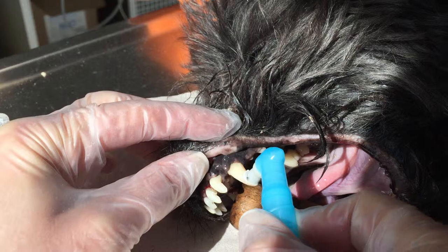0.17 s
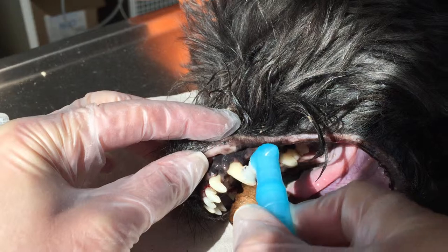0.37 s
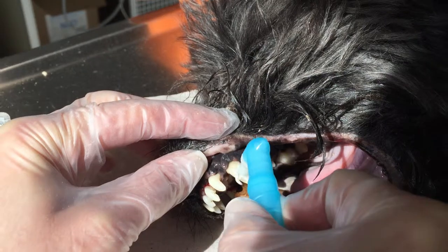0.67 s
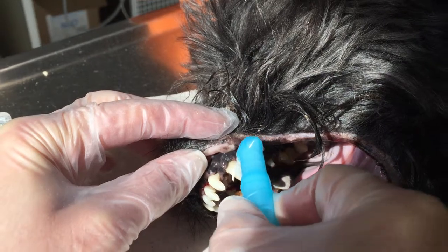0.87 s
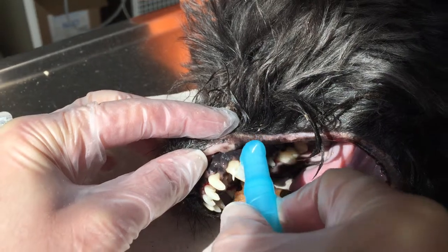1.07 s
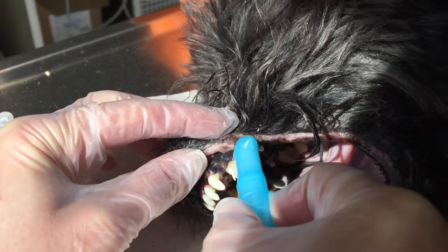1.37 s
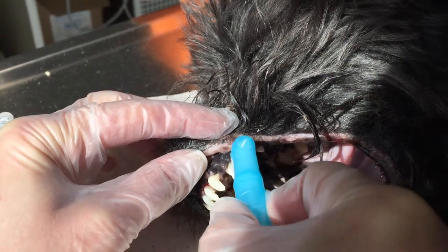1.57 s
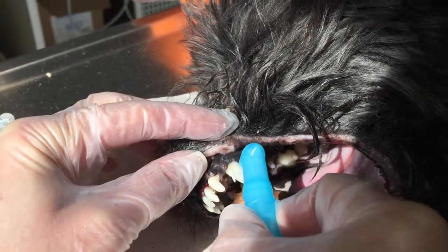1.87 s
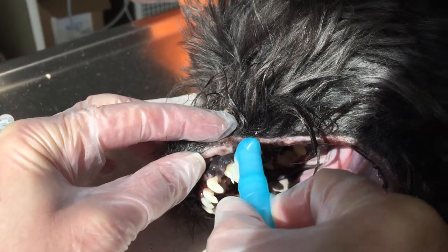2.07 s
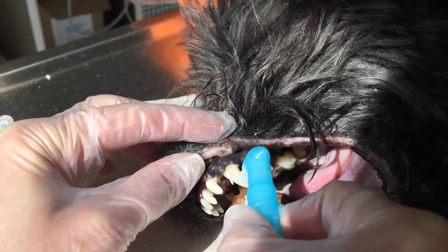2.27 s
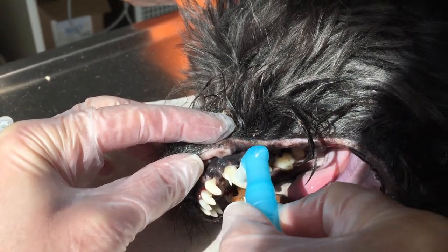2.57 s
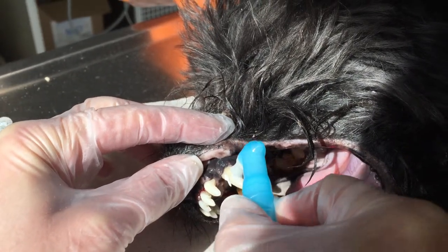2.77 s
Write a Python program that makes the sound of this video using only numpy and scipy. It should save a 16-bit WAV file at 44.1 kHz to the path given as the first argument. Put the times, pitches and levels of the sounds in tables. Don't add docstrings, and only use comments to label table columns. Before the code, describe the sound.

After a tiny silence, a dental polisher is already running close to the microphone: a steady raspy buzz of fast clicks and wet paste scrubbing, shifting with the mouth, with high rubbery squeal coming and going in a quiet clinic room.

```python
import sys
import numpy as np
from scipy import signal
from scipy.fft import rfft, irfft, next_fast_len
from scipy.io import wavfile
from scipy.ndimage import uniform_filter1d, map_coordinates

SR = 44100
rng = np.random.default_rng(int(sys.argv[2]) if len(sys.argv) > 2 else 0)


def voltage_ratio(level):
    return 10 ** (np.asarray(level, float) / 20)


def inscribe(sig):
    pcm = np.round(np.clip(np.atleast_2d(sig).T, -1, 1) * 32767)
    wavfile.write(sys.argv[1], SR, pcm.astype(np.int16))


N = 128772

# (time [s], reversals so far [count])
REVERSAL_COUNT = [(0.1214, 0), (0.1608, 4), (0.2012, 8), (0.3026, 18), (0.3841, 26), (0.4874, 36),
                  (0.6715, 54), (0.7335, 60), (0.9218, 78), (1.0496, 90), (1.2445, 108), (1.3105, 114),
                  (1.4404, 126), (1.8282, 162), (2.0193, 180), (2.1476, 192), (2.3997, 216), (2.4652, 222),
                  (2.5295, 228), (2.725, 246), (2.9224, 264)]
# (time [s], peak level [dB])
FORWARD_KNOCK = [(0.121, -30.5), (0.262, -34), (0.467, -28), (0.487, -24), (0.59, -31.5), (0.651, -24.5),
                 (0.901, -25), (1.093, -24.5), (1.136, -31), (1.18, -26), (1.223, -32), (1.266, -28),
                 (1.31, -31.7), (1.375, -25.5), (1.419, -23.5), (1.462, -29), (1.483, -26), (1.527, -24),
                 (1.548, -24.5), (1.656, -31.5), (1.677, -29), (1.699, -40), (1.72, -26.1), (1.807, -26),
                 (1.956, -23.5), (1.998, -27), (2.105, -22), (2.253, -23.5), (2.274, -24), (2.337, -22.4),
                 (2.422, -27), (2.465, -21.5), (2.573, -17), (2.813, -19.5), (2.879, -20.5), (2.9, -23)]
# (time [s], peak level [dB])
BACK_KNOCK = [(0.131, -30.5), (0.313, -24), (0.415, -31), (0.436, -30.5), (0.559, -31.5), (0.682, -24),
              (0.723, -24), (0.765, -20), (0.869, -28), (0.911, -20), (0.954, -31), (1.06, -19.5),
              (1.277, -19), (1.343, -13.5), (1.365, -20), (1.451, -14), (1.473, -23), (1.537, -16),
              (1.602, -20), (1.645, -13), (1.667, -15), (1.731, -15.5), (1.753, -21), (1.817, -18),
              (1.839, -20), (1.86, -14.5), (1.881, -21.7), (1.945, -24), (2.116, -10.5), (2.2, -16.5),
              (2.242, -14.5), (2.284, -20.5), (2.305, -17.6), (2.326, -20.5), (2.411, -11.5),
              (2.562, -21.5), (2.606, -15), (2.649, -17.5), (2.692, -12.5), (2.736, -12.5), (2.802, -27),
              (2.824, -15), (2.846, -24), (2.911, -23)]
# (time [s], peak level [dB])
FORWARD_SQUEAK = [(0.12, -53), (1.093, -33.5), (1.115, -34), (1.136, -19), (1.158, -23), (1.223, -15.5),
                  (1.266, -18), (1.31, -32), (1.332, -22.5), (1.375, -21.5), (1.44, -29), (1.462, -31),
                  (1.483, -22), (1.505, -34), (1.548, -18), (1.613, -19.5), (1.656, -12.5), (1.699, -26.5),
                  (1.807, -18), (1.828, -20), (1.849, -19.5), (1.871, -32.7), (1.892, -31), (1.977, -27.5),
                  (1.998, -36), (2.019, -36), (2.126, -31), (2.169, -37), (2.295, -39), (2.337, -38),
                  (2.4, -43), (2.443, -32), (2.53, -37), (2.551, -28), (2.66, -33), (2.747, -18.5),
                  (2.835, -15), (2.857, -22.5), (2.9, -14.5)]
# (time [s], peak level [dB])
BACK_SQUEAK = [(.12, -43), (.6, -45), (.78, -32.5), (1, -39.5), (2.45, -40), (2.54, -33), (2.585, -20),
               (2.62, -27), (2.67, -37), (2.72, -29), (2.8, -29.5), (2.845, -21), (2.865, -19), (2.89, -27),
               (2.92, -22)]
# (time [s], level [dB])
SCRUB_LEVEL = [(.12, -36), (.3, -35.5), (.4, -36), (.5, -37), (.65, -36), (.85, -38), (.97, -36),
               (1.1, -38), (1.5, -40), (1.95, -37.5), (2.1, -38), (2.3, -39), (2.42, -38), (2.5, -34),
               (2.65, -38), (2.92, -37.5)]
# (time [s], opening [0 shut, 1 half, 2 open])
MOUTH_OPENING = [(.12, 0), (.3, .15), (.4, 1), (.5, 1.6), (.6, 1.3), (.7, 2), (.9, 1.8), (.97, 1),
                 (1.2, 1.3), (1.45, 1.6), (1.95, 1.2), (2.2, 1.4), (2.42, 1.9), (2.48, .9), (2.6, 1.4),
                 (2.7, 1), (2.92, 1.2)]
# (time [s], peak level [dB])
SHAFT_LOAD = [(.13, -39), (.42, -32), (.6, -39), (.66, -31), (.8, -36), (.9, -39.5), (1.1, -33),
              (1.25, -38), (1.33, -29), (1.5, -35.5), (1.7, -33.5), (1.87, -34), (2.03, -38), (2.07, -26.5),
              (2.2, -29.5), (2.3, -36), (2.42, -27.5), (2.92, -31.5)]
# (time [s], frequency [Hz], level over back knock [dB])
CHEEK_GAP = [(.12, 2530, -8), (.3, 2570, -9), (.42, 3100, 7.5), (.6, 2930, 2.5), (.8, 3300, -1.5),
             (1.15, 3530, -12), (1.3, 3060, -13), (1.8, 2820, -12), (2, 3060, -11), (2.08, 2860, -14),
             (2.2, 3000, -13), (2.35, 3100, -3), (2.43, 3430, -7), (2.46, 2350, -8.5), (2.52, 2680, -3.5),
             (2.62, 2860, -18), (2.7, 2570, -13.5), (2.92, 2600, -24)]
# (time [s], frequency [Hz], level over back knock [dB])
TOOTH_RING = [(.12, 4100, -4), (1.2, 4150, -27), (1.3, 4300, -12.5), (1.45, 4300, -8), (1.6, 4160, -12),
              (1.9, 4480, -10), (2.02, 4380, -14), (2.06, 5200, -11.5), (2.18, 5300, -7), (2.26, 5230, -24),
              (2.35, 4060, -25), (2.42, 3950, -17), (2.55, 4230, -13), (2.7, 4600, -25), (2.92, 4100, -15)]
# (frequency [Hz], level over forward knock [dB], decay [dB/ms])
NECK_RING = [(2350, -10.5, 6.5), (6850, -2, 20)]
# (frequency [Hz], width [Hz], level [dB])
HEAD_MODES = [(1137, 303, -8.5), (4430, 1030, -3.5), (5480, 380, -1), (6603, 607, 4), (7815, 1140, 2),
              (9660, 760, 1.5), (12260, 2200, -5), (14780, 1170, -8.5)]
# (frequency [Hz], width [Hz], level [dB])
SHUT_MODES = [(1720, 620, 3.5), (2540, 640, 7), (3160, 760, 4.5)]
# (frequency [Hz], width [Hz], level [dB])
HALF_MODES = [(1940, 1300, -9.5), (2710, 274, 2.5), (3080, 530, 0.5)]
# (frequency [Hz], width [Hz], level [dB])
OPEN_MODES = [(1840, 590, -9), (2700, 510, 0.5), (3310, 310, 5)]
# (frequency [Hz], width [Hz], level [dB])
GEARBOX_MODES = [(848, 176, -2), (1065, 305, 2.5), (1880, 840, 3.5)]
# (multiple of reversal rate [-], rms level [dB])
MOTOR_ORDERS = [(3, -82), (4, -77), (5, -78.5), (6, -76.5), (7, -81)]
# (frequency [Hz], density [dB per Hz])
AIR_SPECTRUM = [(15, -38), (33, -5), (70, 1), (102, -11.5), (129, -6), (253, -6), (303, -5), (515, -9),
                (850, -6), (1100, -1), (1870, -120)]
# (frequency [Hz], rms level [dB])
FAN_LINES = [(48.4, -104), (68.7, -80), (305.4, -77.5)]
# (delay [s], level [dB])
ECHOES = [(.0031, -34), (.0064, -34.5), (.0093, -47)]

START_S, FADE_S = 0.1205, 0.00062
AROUND = np.arange(-400, 400)
AROUND_S = AROUND / SR
EARLY_S = 0.0003
TICK_BACK_S = 0.0042
SLIP_S = 2.5


def unit(x):
    return x / np.sqrt(np.mean(x ** 2) + 1e-20)


def at(rows, s, column=1):
    table = np.array(rows)
    return np.interp(s, table[:, 0], table[:, column])


def wobble(rate_hz):
    knots = rng.standard_normal(int(N * rate_hz / SR) + 4)
    return map_coordinates(knots, [np.arange(N) * rate_hz / SR])


def filtered(x, response):
    m = next_fast_len(N + 8192)
    return irfft(rfft(x, m) * response(np.fft.rfftfreq(m, 1 / SR)), m)[:N]


def ringing(peaks):
    def response(f):
        total = 0
        for k, (hz, width_hz, db) in enumerate(peaks):
            damping = 1j * f * width_hz
            total = total + (-1) ** k * voltage_ratio(db) * damping / (hz * hz - f * f + damping)
        return total
    return response


def placed(times_s, shapes):
    index = np.round(times_s * SR).astype(int)[:, None] + AROUND
    return np.bincount(index.ravel(), shapes.ravel(), N + SR)[:N]


def tent(rise_db_ms, fall_db_ms, hold_s=0):
    ms = AROUND_S * 1000
    return voltage_ratio(rise_db_ms * np.minimum(ms, 0) - fall_db_ms * np.maximum(ms - 1000 * hold_s, 0))


def reversals():
    s, count = np.transpose(REVERSAL_COUNT)
    times_s = np.interp(np.arange(count[-1] + 1), count, s)
    return times_s[::2], times_s[1::2]


def turning():
    s, count = np.transpose(REVERSAL_COUNT)
    t = np.arange(-SR, N) / SR
    speed = np.gradient(np.interp(t, np.r_[s[0] - 2, s], np.r_[-204, count]))
    lag = np.cumsum(uniform_filter1d(speed, size=2000) - speed)[SR:]
    total = np.cumsum(speed)
    return total[SR:] + lag - total[SR + round(s[0] * SR)]


def clinic():
    hz, density_db = np.transpose(AIR_SPECTRUM)
    air = filtered(rng.standard_normal(N), lambda f: voltage_ratio(np.interp(np.log(f + 1), np.log(hz), density_db)))
    t = np.arange(N) / SR
    fans = 0
    for fan_hz, db in FAN_LINES:
        level = np.sqrt(2) * voltage_ratio(db + 2.5 * wobble(9 + fan_hz / 15))
        fans = fans + level * np.sin(2 * np.pi * fan_hz * t)
    return voltage_ratio(-67.5 + 0.46 * wobble(7.4)) * unit(air) + fans


def motor():
    settles_s = 1
    t, count = np.arange(N) / SR, turning()
    lines = sum(voltage_ratio(db + 5 * wobble(7)) * np.sin(2 * np.pi * k * count) for k, db in MOTOR_ORDERS)
    return np.sqrt(2) * lines / (1 + (t / settles_s) ** 4) ** 0.5


def gears():
    level_db, start_db, settles_s = -53, 21.5, 0.35
    leak, cut_hz, mesh_db = 0.23, 870, 4
    t, turn = np.arange(N) / SR, turning() / 2
    flaws = rng.standard_normal((40, 256))
    place = [t * 5.52, turn % 1 * flaws.shape[1]]
    grind = map_coordinates(flaws, place, order=1, mode="grid-wrap")
    grind = grind * voltage_ratio(mesh_db * np.cos(8 * np.pi * turn))
    casing = ringing(GEARBOX_MODES)
    grind = filtered(grind, lambda f: casing(f) * (leak + f ** 6 / (f ** 6 + cut_hz ** 6)))
    return unit(grind) * voltage_ratio(level_db + start_db * np.exp(-t / settles_s))


def rattle(times_s, db, slopes_db_ms, scatter_db, crack):
    jitter_s = 0.0001
    shape = (len(times_s), len(AROUND))
    grit = rng.standard_normal(shape) * voltage_ratio(2.3 * rng.standard_normal(shape))
    grit = 1.8 * uniform_filter1d(grit, size=3, axis=0)
    draw = rng.standard_normal((len(times_s), 3))
    blow = grit * tent(*slopes_db_ms) + crack * voltage_ratio(draw[:, :1]) * (AROUND == 0)
    blow = 6.5 * blow / np.linalg.norm(blow, axis=1, keepdims=True)
    level = voltage_ratio(db + scatter_db * draw[:, 2])[:, None]
    return placed(times_s - EARLY_S + jitter_s * draw[:, 1], level * blow)


TICK_DB = -36.5


def early_tick_db(back):
    start_db, fade_s = -21, 0.3
    return TICK_DB + (start_db - TICK_DB) * np.exp(-((back - START_S) / fade_s) ** 2)


def knocks(forward, back):
    tick_s, tick_slopes_db_ms = 0.0049, (25, 10)
    x = rattle(forward, at(FORWARD_KNOCK, forward) + 2.9, (16, 9), 0.6, crack=3.9)
    x += rattle(back, at(BACK_KNOCK, back) + 0.74, (13, 7), 0.7, crack=7.9)
    x += rattle(forward + tick_s, TICK_DB, tick_slopes_db_ms, 2, crack=3.8)
    return x + rattle(back + TICK_BACK_S, early_tick_db(back), tick_slopes_db_ms, 0.6, crack=6.4)


def ring(times_s, hz, db, fall_db_ms):
    draw = rng.standard_normal((len(times_s), 3))
    struck_hz = (hz * (1 + 0.018 * draw[:, 0]))[:, None]
    tone = np.sin(2 * np.pi * struck_hz * AROUND_S + draw[:, 1:2])
    level = voltage_ratio(db + 0.41 * draw[:, 2])[:, None]
    return placed(times_s - EARLY_S, level * tent(23.5, fall_db_ms) * tone)


def rings(forward, back):
    x = np.zeros(N)
    for part in (CHEEK_GAP, TOOTH_RING):
        db = at(BACK_KNOCK, back) + at(part, back, column=2)
        x += ring(back, at(part, back), db, fall_db_ms=13.5)
    x += ring(back + TICK_BACK_S, 2200, early_tick_db(back) - 5.5, fall_db_ms=7.1)
    for hz, db, fall_db_ms in NECK_RING:
        x += ring(forward, hz, at(FORWARD_KNOCK, forward) + db, fall_db_ms)
    return x


def scrub():
    dull_hz = 6000
    grain = rng.standard_normal(N) * voltage_ratio(3 * wobble(1500) + 0.5 * wobble(120) + 0.55 * wobble(12))
    grain = filtered(grain, lambda f: 1 / (1 + 1j * f / dull_hz))
    return unit(grain) * voltage_ratio(at(SCRUB_LEVEL, np.arange(N) / SR))


def shaft(forward, back):
    sing_hz, rise_hz_ms = 1099, 40
    lead_s, forward_lead_s, forward_db = 0.0012, 0.00368, -9
    times_s = np.concatenate([back, forward - forward_lead_s]) - lead_s
    load_db = at(SHAFT_LOAD, times_s) + forward_db * (np.arange(len(times_s)) >= len(back))
    draw = rng.standard_normal((len(times_s), 2))
    hz = sing_hz + rise_hz_ms * 500 * AROUND_S
    tone = np.sin(2 * np.pi * hz * AROUND_S + 0.076 * draw[:, :1])
    level = voltage_ratio(load_db[:, None] + 1.2 * draw[:, 1:])
    return placed(times_s, level * tent(4.5, 8, hold_s=0.00048) * tone)


def squeak(times_s, rows, scatter_db):
    squeak_hz, chatter_lag = 5988, 50
    late, slipping = times_s > SLIP_S, np.arange(N) / SR > SLIP_S
    shape = tent(5.5, 16, np.where(late, 0.0018, 0.0014)[:, None])
    db = at(rows, times_s) + scatter_db * rng.standard_normal(len(times_s))
    lead_s = np.where(late, 0.0028, 0.0016)
    swell = placed(times_s - lead_s, voltage_ratio(db)[:, None] * shape)
    swell = uniform_filter1d(swell, size=15) * voltage_ratio(1.47 * wobble(800))
    rough = 0.0125 * np.where(slipping, 1.8, 1) * wobble(900)
    hz = squeak_hz * (1 + rough + 0.002 * wobble(30) - 0.012 * slipping)
    phase = 2 * np.pi * np.cumsum(hz) / SR
    overtone = voltage_ratio(-14.5 - 5 * slipping + 3 * wobble(900)) * np.sin(2 * phase + 0.5 * wobble(1500))
    tone = np.sin(phase) + overtone
    chatter_db = np.where(slipping, -6, -12) + 4 * wobble(1200)
    chatter = np.roll(swell, chatter_lag) * voltage_ratio(chatter_db) * rng.standard_normal(N)
    return np.array([swell * tone, chatter])


def near_field(f):
    ratio = f / 1141
    low_cut = (1j * ratio) ** 6 / (1 - ratio ** 2 + 1.1j * ratio) ** 3
    return low_cut * (1 + sum(voltage_ratio(db) * np.exp(-2j * np.pi * f * s) for s, db in ECHOES))


def scene():
    covered_db, mouth_knock_db = -2.5, -3
    forward, back = reversals()
    forward_squeak = squeak(forward, FORWARD_SQUEAK, scatter_db=0.5)
    tone, chatter = forward_squeak + squeak(back, BACK_SQUEAK, scatter_db=-1.7)
    blows, rub = knocks(forward, back), scrub() + chatter
    opening = at(MOUTH_OPENING, np.arange(N) / SR)
    tool = voltage_ratio(covered_db * np.clip(1 - opening, 0, 1)) * filtered(blows + rub, ringing(HEAD_MODES))
    tool = tool + tone + shaft(forward, back) + rings(forward, back)
    for state, modes in enumerate([SHUT_MODES, HALF_MODES, OPEN_MODES]):
        share = np.clip(1 - abs(opening - state), 0, 1)
        tool = tool + share * filtered(voltage_ratio(mouth_knock_db) * blows + rub, ringing(modes))
    return (filtered(tool, near_field) + gears() + motor() + clinic())[None]


def band_limit(x):
    return signal.sosfilt(signal.butter(12, 15940, fs=SR, output="sos"), x)


def record(dry):
    top_hz, top_db, slope_db_hz = 15250, -6, 0.018
    gate = np.clip((np.arange(N) / SR - START_S) / FADE_S, 0, 1)
    x = filtered(dry[0], lambda f: voltage_ratio((f > top_hz) * (top_db - slope_db_hz * (f - top_hz))))
    mix = x[None] * gate
    return band_limit(mix)


dry = scene()
out = record(dry)
inscribe(out)
```